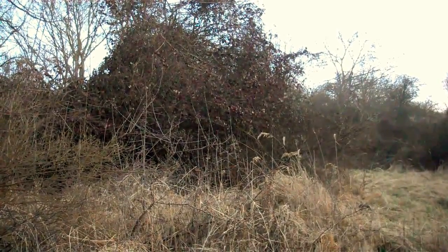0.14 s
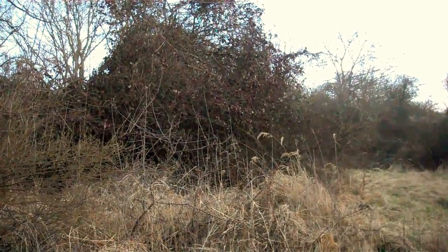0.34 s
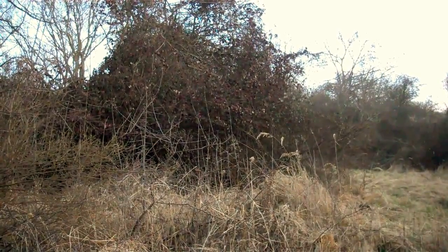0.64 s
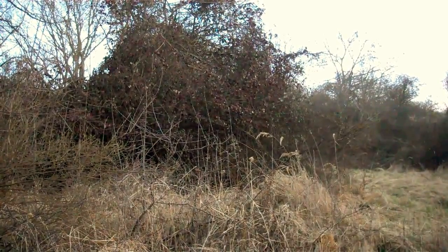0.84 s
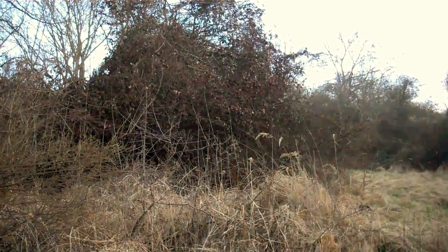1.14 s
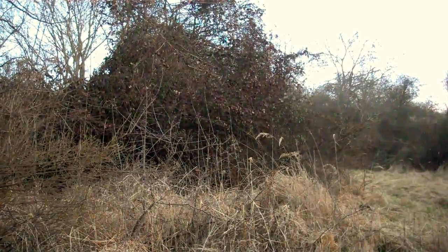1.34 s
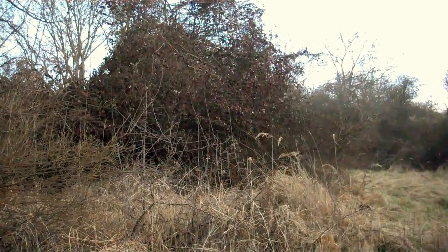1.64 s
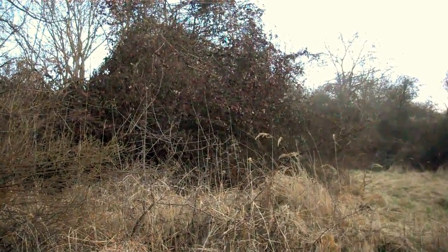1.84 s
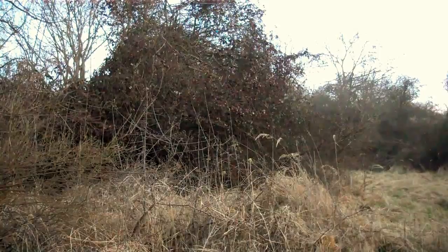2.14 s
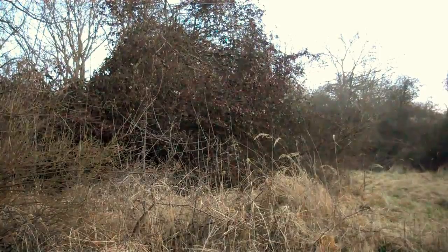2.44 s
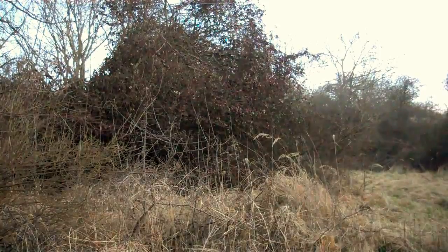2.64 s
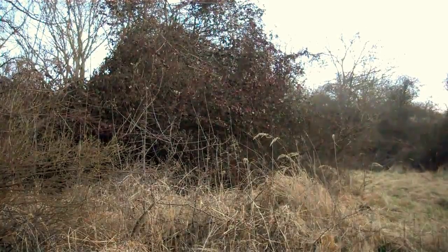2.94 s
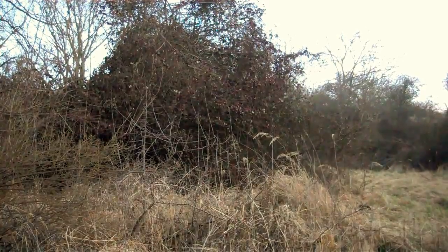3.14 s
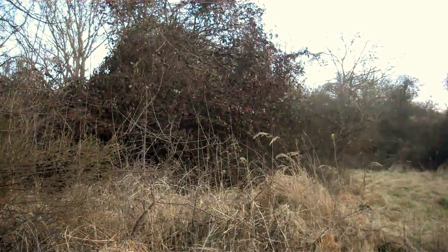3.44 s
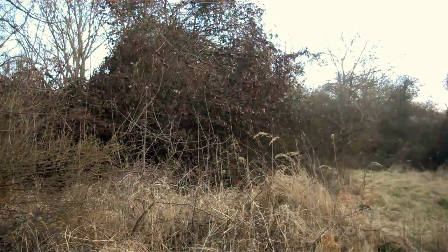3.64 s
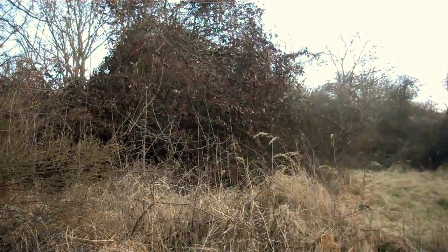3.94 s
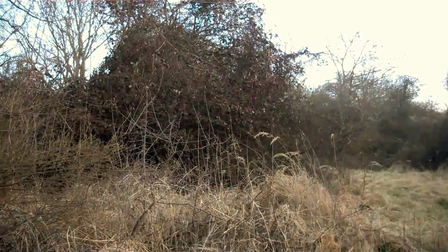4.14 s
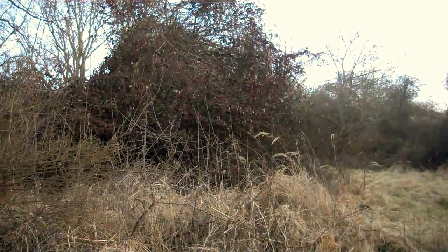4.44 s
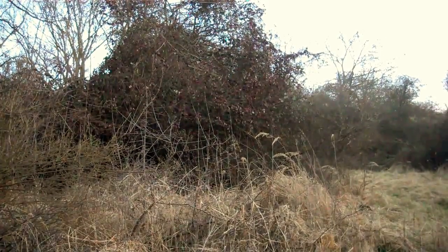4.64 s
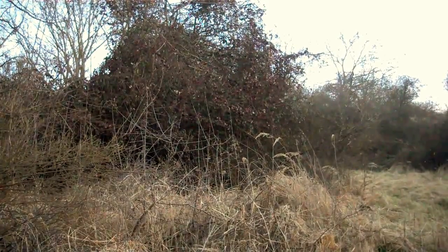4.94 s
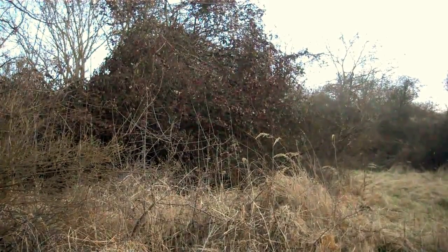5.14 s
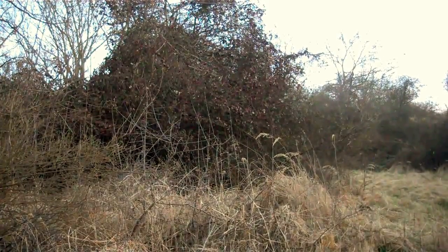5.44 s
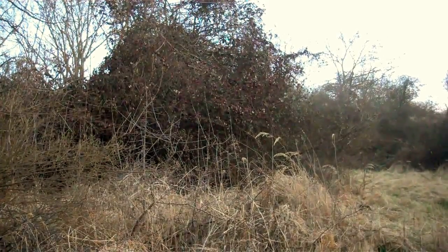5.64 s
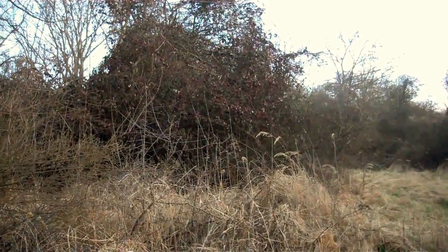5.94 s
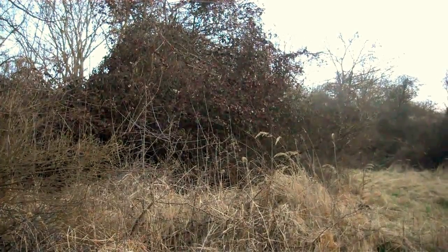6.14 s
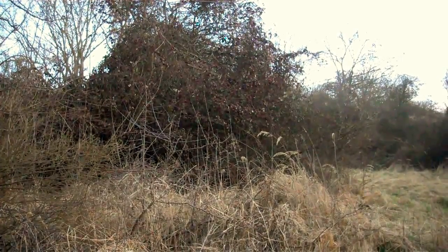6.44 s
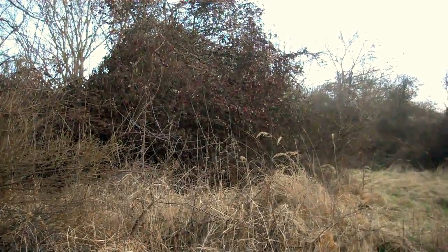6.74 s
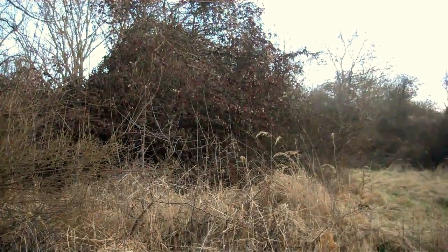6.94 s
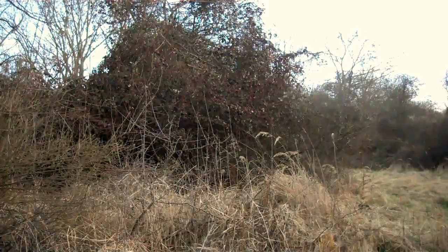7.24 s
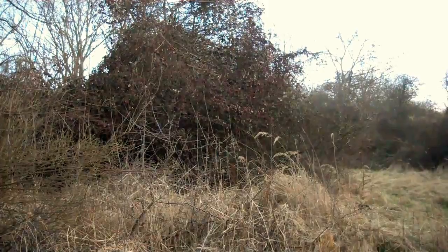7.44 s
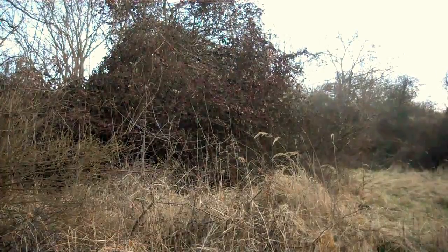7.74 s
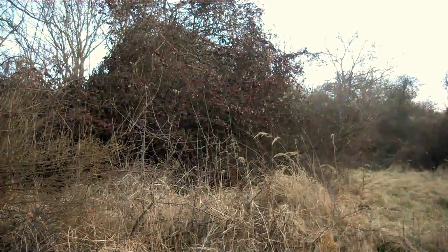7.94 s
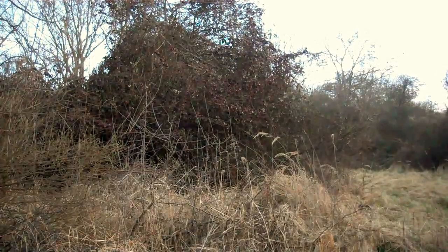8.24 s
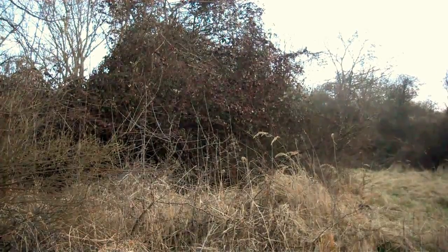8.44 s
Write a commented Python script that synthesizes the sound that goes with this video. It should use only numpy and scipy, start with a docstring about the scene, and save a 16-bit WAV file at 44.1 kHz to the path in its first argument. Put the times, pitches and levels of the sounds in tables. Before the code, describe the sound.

A songbird, fairly close and a little right of the microphone, opens with buzzy rattles and fast sweeping notes. After a gap, five thin, swelling whistles lead into a bright burst of warbling, high swoops and a brief trill. Strong wind makes an even, low rushing noise throughout this outdoor scene, with far birds calling faintly and a few small dry ticks.

```python
"""In a thicket by a windy field, a little to the right, a songbird sings: rattles, sweeps, a pause, five
swelling whistles, a warble, swoops and a trill. A vibrating membrane gives its nearly pure tones; fast
pulses, filtered by the throat, give its buzzes. The ground reflects the song and twigs and trunks scatter
it. A few dry ticks sound, far birds pipe faintly, and the wind roars steadily as low, broadband noise."""
import sys
import numpy as np
from scipy import signal
from scipy.fft import rfft, irfft, next_fast_len
from scipy.io import wavfile
from scipy.ndimage import uniform_filter1d, map_coordinates

SR = 44100
rng = np.random.default_rng(int(sys.argv[2]) if len(sys.argv) > 2 else 0)


def digitize_waveform(pressure):
    """Quantize a signal to 16-bit integers and store it at the path in sys.argv[1].

    Rows of a 2-D input are taken as channels; values are limited to [-1, 1].
    """
    field = np.atleast_2d(pressure).T
    bounded = np.clip(field, -1, 1)
    quanta = np.round(bounded * 32767).astype(np.int16)
    wavfile.write(sys.argv[1], SR, quanta)


N = 379260
TOP_HZ = 15700  # upper band limit

# Arched notes: onset t/s, duration/s, first f/Hz, last f/Hz, pitch vertex t/s, peak level/dB, peak t/s,
# start below peak/dB, end below peak/dB. Vertex and peak times count from the note's onset.
SINGLE_ARCHES = [(7.17, 0.022, 1610, 1310, .002, -31, .008, 6, 9),
                 (7.514, 0.032, 5330, 6700, -0.00038, -19, 0.014, 20, 4),
                 (7.537, 0.011, 6600, 9200, -.01, -24, .002, 3, 6.2),
                 (7.659, 0.032, 4960, 7300, -0.012, -15.5, 0.019, 8.5, 5.8),
                 (7.79, .04, 4870, 7900, -0.012, -16, .024, 11, 5.1),
                 (8.152, 0.025, 2720, 3560, .018, -18, 0.0093, 21, 3.3),
                 (8.163, .031, 2350, 3480, 0.031, -10.5, .021, 23, 3),
                 (8.191, 0.03, 3450, 4030, -.03, -8.5, .015, 4, 8.5),
                 (8.222, .029, 3380, 4160, 0.03, -9.5, 0.015, 8.4, 6),
                 (8.252, 0.034, 3530, 4236, 0.028, -10.5, 0.012, 9.6, 11.6)]
# Two-note figures: same columns, onsets counted from the start of the figure
SEESAW_NOTES = [(0, 0.02, 1300, 2200, .06, -28, 0.017, 16, 3),
                (.026, 0.013, 3550, 1820, 0.0145, -18.5, 0.005, 5, 9)]
HOOK_NOTES = [(0, .022, 3700, 4795, 0.021, -15.5, 0.016, 13, 4.3),
              (.016, .03, 3294, 2010, 0.0074, -10, 0.018, 10.3, 12)]
SCOOP_NOTES = [(0, .013, 1424, 1970, -0.014, -26, 0.02, 7.1, 0.5),
               (.011, .035, 1885, 2790, .027, -13.5, 0.019, 7.4, 9.5)]
TOCK_NOTES = [(0, .014, 2570, 1487, .012, -25.5, 0.0016, 2, 6),
              (.021, .034, 1335, 1484, .022, -31, 0.033, 4.1, 5)]
# Repeats of each figure: t/s, gain/dB
SEESAW_REPEATS = [(.468, 0.5), (.5164, 3), (0.5682, -.4)]
HOOK_REPEATS = [(.682, -1.4), (.846, .6), (1.022, -.5)]
SCOOP_REPEATS = [(0.759, -0.098), (.929, 0.19), (1.099, -0.39)]
TOCK_REPEATS = [(7.931, -.6), (8.037, 0.026)]
# Long whistles: t/s, duration/s, first f/Hz, last f/Hz, slide from above/Hz, waver depth/Hz,
# waver crest t/s, waver period/s, full level/dB, swell/dB
WHISTLE_NOTES = [(3.878, 0.344, 2770, 2690, 200, 25, 4.03, 0.165, -27.5, 28),
                 (4.595, 0.492, 2700, 2795, 200, 32, 4.825, .24, -24.5, 18),
                 (5.45, 0.41, 2690, 2590, 40, 30, 5.57, 0.21, -17, 15),
                 (6.094, 0.411, 2520, 2620, 200, 32, 6.29, .185, -17.5, 10.5),
                 (6.692, 0.356, 2515, 2525, 270, 14, 6.89, 0.1474, -18.5, 3.5)]
# Falling swoops: t/s, duration/s, top f/Hz, time constant/s, level/dB
SWOOP_NOTES = [(7.55, 0.049, 5800, 0.011, -6.5), (7.694, 0.045, 5120, 0.0083, -9.5),
               (7.835, 0.04, 5070, .008, -13)]
# Upward flicks of the warble: t/s, rise/Hz
WARBLE_FLICKS = [(7.352, 3200), (7.376, 480), (7.393, 852), (7.413, 199), (7.439, 476)]
# Buzz contours: t/s (the rattle's from its own start), pulse rate/Hz, level/dB
RATTLE_CONTOUR = [(0, 954, -12), (.004, 1045, -7), (.0095, 980, -1.5), (.022, 850, -15)]
SNAP_CONTOUR = [(1.209, 1800, -25), (1.216, 1120, -25.5), (1.226, 1805, -21.5), (1.237, 1920, -21.5),
                (1.254, 1920, -25.5), (1.259, 1910, -25)]
# Spectral shapes in the song: f/Hz, gain/dB
SWOOP_GAIN = [(2340, -4.5), (2850, -9), (4200, -1), (5800, -12)]  # along a swoop's descent
OVERTONE_GAIN = [(3200, -27), (5200, -53), (8500, -45.5), (10500, -38.5), (13000, -33.5), (14500, -48),
                 (15500, -60)]  # relative to the fundamental
SECOND_HARMONIC_GAIN = [(5600, 14), (6600, -5), (10500, 14), (14500, 21)]  # added for the second harmonic
HIGH_NOTE_HISS = [(2000, -17), (5000, -4.5), (8800, -16.5), (12500, 1.5), (15500, -28)]  # hiss that rises with the high notes
THROAT_RESPONSE = [(2300, -13), (3500, 0), (5900, -0.5), (7400, -1.5), (8200, -21), (11200, -17),
                   (15000, -24.5)]  # colours the buzzes
# Dry ticks: t/s, level/dB, f/Hz
DRY_TICKS = [(3.535, -40, 3000), (3.545, -40, 2900), (5.2945, -30, 2000), (5.886, -43, 6330)]
# Contours of a rising and a falling far call: t/s, f/Hz, level/dB
FAR_RISING = [(2.515, 3610, -51), (2.53, 3900, -48.5), (2.56, 3930, -48), (2.635, 4680, -52)]
FAR_FALLING = [(5.695, 5300, -57), (5.79, 3500, -62)]
# Repeats of the rising call: delay/s
FAR_RISING_DELAYS = [0, 3.805]
# Far pipes of constant pitch: t/s, level/dB, f/Hz
FAR_PIPES = [(.42, -55, 4300), (3.36, -61, 4300), (3.71, -59, 4280), (4.03, -65, 6950), (4.05, -60, 4265),
             (4.15, -58, 4480), (4.23, -59, 4150), (4.43, -56, 4280), (4.82, -54, 4265), (5.2, -51.5, 4265),
             (5.6, -51, 4265), (8.52, -55, 4265)]
# Far twitter, smeared by distance: t/s, first f/Hz, level/dB
FAR_TWITTER = [(4.04, 8200, -60), (4.27, 8100, -58), (4.46, 8100, -53), (4.65, 5900, -54)]
# Wind spectrum: f/Hz, relative spectral density/dB
WIND_SPECTRUM = [(12, -40), (30, -7.5), (55, -1), (140, -2.5), (650, -19), (1530, -34.5), (7640, -45.5),
                 (9800, -60.5), (13500, -66.5), (15500, -89.5)]
# Likeness of the wind on the two sides: f/Hz, correlation/1
WIND_COHERENCE = [(30, 1), (150, 0.6), (700, 0.79), (15000, 0)]
# Stereo balance: f/Hz, left minus right level/dB
BIRD_BALANCE = [(3000, -4), (6000, -5.5), (12000, 0.5)]
WIND_BALANCE = [(60, 4.3), (950, -1), (15000, 0.5)]


def membrane_tones():
    """A vibrating membrane gives a wavering sine; overtones grow with effort, rasp and hiss with pitch."""
    tone, hiss_envelope = np.zeros(N), np.zeros(N)
    for note, shift, gain_db in tonal_notes():
        hz, db, fade = contour(note)
        size = len(hz)
        db = db + gain_db + .75 * wobble(75, size)
        phase = phase_of(hz * (1 + .003 * wobble(90, size)))
        strain = np.clip(hz / 3000 - 1, 0, 1)
        wave = (1 + (.03 + .29 * strain) * wobble(711, size)) * np.sin(phase)
        for k in range(2, 7):
            flutter = 1 + .65 * wobble(hz.mean() / 8, size)
            effort_db = .12 * k ** 2 * np.minimum(db + 17.5, 0)
            colour_db = along(SECOND_HARMONIC_GAIN, k * hz) * (k == 2) - 16 * (k == 4)
            gain = amp(along(OVERTONE_GAIN, k * hz) + effort_db + colour_db) * (k * hz < TOP_HZ)
            wave += gain * flutter * np.sin(k * phase)
        onset, envelope = note[0][0] + shift, amp(db) * fade
        add(tone, onset, envelope * wave)
        add(hiss_envelope, onset, envelope * strain ** 1.5)
    hiss = unit_rms(filtered(rng.standard_normal(N), lambda hz: amp(along(HIGH_NOTE_HISS, hz))))
    return tone + amp(-19.5) * hiss_envelope * hiss


def tonal_notes():
    """Song is built of repeated figures and single notes: (contour points, shift/s, gain/dB) for each."""
    # the three hooks differ a little in length; the gain column also sets the length
    notes = [(arch(*row) * [1 + .08 * db, 1, 1], s, db) for row in HOOK_NOTES for s, db in HOOK_REPEATS]
    for figure, repeats in [(SEESAW_NOTES, SEESAW_REPEATS), (SCOOP_NOTES, SCOOP_REPEATS),
                            (TOCK_NOTES, TOCK_REPEATS)]:
        notes += [(arch(*row), s, db) for row in figure for s, db in repeats]
    for shape, rows in [(arch, SINGLE_ARCHES), (whistle, WHISTLE_NOTES), (swoop, SWOOP_NOTES)]:
        notes += [(shape(*row), 0, 0) for row in rows]
    return notes + [(cluck(), 0, 0), (warble(), 0, 0)]


def arch(onset, length, first_hz, last_hz, vertex_s, peak_db, peak_s, enter_db, leave_db):
    """A parabolic frequency sweep whose level rises to a peak and falls away."""
    t = np.linspace(0, length, 40)
    below_db = np.interp(t, [0, np.clip(peak_s, 0, length), length + 1e-6], [enter_db, 0, leave_db])
    return np.transpose([onset + t, parabola(t, first_hz, last_hz, vertex_s), peak_db - below_db])


def whistle(onset, length, first_hz, last_hz, slide_hz, waver_hz, crest_s, period_s, full_db, swell_db):
    """Slow frequency and amplitude modulation of a tone that slides in from above, swells and sags off."""
    t = np.linspace(.001, length, 200)
    waver = np.cos(2 * np.pi * (onset + t - crest_s) / period_s)
    glide_hz = first_hz + (last_hz - first_hz) * t / length + slide_hz * np.exp(-t / .031)
    sag_hz = 400 * np.exp((t - length) / .005)
    attack_db = 20 * np.log10(1 - np.exp(-t / .05))
    release_db = 26 * np.exp((t - length) / .009)
    db = full_db - swell_db * (1 - t / length) + attack_db - release_db + 1.3 * waver
    return np.transpose([onset + t, glide_hz - sag_hz + waver_hz * waver, db])


def swoop(onset, length, top_hz, fall_s, db, landing_hz=2310, release_db=11):
    """Frequency falls exponentially towards a low landing pitch."""
    t = np.linspace(0, length, 60)
    hz = landing_hz + (top_hz - landing_hz) * np.exp(-t / fall_s)
    return np.transpose([onset + t, hz, db + along(SWOOP_GAIN, hz) - release_db * (t / length) ** 8])


def cluck(onset=7.224, length=.0522, throb_s=.0128, depth_db=14):
    """Amplitude modulation makes a low arch throb three times before a weak tail."""
    t = np.linspace(0, length, 80)
    throb_db = -16.5 - depth_db * np.cos(np.pi * t / throb_s) ** 2
    db = np.where(t < 3 * throb_s, throb_db, -26)
    return np.transpose([onset + t, parabola(t, first_hz=1870, last_hz=1410, vertex_s=.021), db])


def warble(onset=7.341, length=.1047, held_hz=3232, flick_s=.0047, loss_db_per_khz=2.5):
    """Frequency modulation by Gaussian pulses: a held tone flicks upward, weaker the higher it reaches."""
    t = np.linspace(0, length, 150)
    rise_hz = sum(hz * np.exp(-.5 * ((onset + t - s) / flick_s) ** 2) for s, hz in WARBLE_FLICKS)
    attack_db = -11 * np.exp(-t / .0053)
    db = -11.5 - loss_db_per_khz * rise_hz / 1000 + attack_db
    return np.transpose([onset + t, held_hz + rise_hz, db])


def buzz(points, roughness):
    """Source and filter: fast pulses form a series of unsteady harmonics, weighted by the throat."""
    hz, db, fade = contour(points)
    k = np.arange(3, 19)[:, None]
    flutter = 1 + roughness * k * np.array([wobble(510, len(hz)) for _ in k])
    gain = amp(along(THROAT_RESPONSE, k * hz)) * (k * hz < TOP_HZ)
    harmonics = gain * flutter * np.sin(k * phase_of(hz) + 2 * np.pi * rng.random(k.shape))
    return amp(db) * fade * harmonics.sum(axis=0)


def rattles_and_snap(first_s=-.042, period_s=.10116, first_db=-37.5, step_db=1.05):
    """Bursts of pulses: five pairs of rattles grow louder, and a snap ends the first phrase."""
    out = np.zeros(N)
    for pair in range(5):
        s, db = first_s + pair * period_s, first_db + pair * step_db
        add(out, s, amp(db) * buzz(RATTLE_CONTOUR, roughness=.4))
        add(out, s + .03, amp(db + 2.5) * buzz(RATTLE_CONTOUR, roughness=.4))
    add(out, SNAP_CONTOUR[0][0], buzz(SNAP_CONTOUR, roughness=.16))
    return out


def thicket(song, ground_delay_s=.004):
    """Multipath: the ground echo beats against glides, twigs return treble, far trees a dull tail."""
    ground = np.pad(song, (round(ground_delay_s * SR), 0))[:N]
    twigs = filtered(scatter(song, t60=.13, rise_s=.009), lambda hz: (hz / 4000) ** .8)
    trees = filtered(scatter(song, t60=.7, rise_s=.03), lambda hz: 1 / (1 + (hz / 5500) ** 4))
    return song + amp(-14) * ground + amp(-12) * twigs + amp(-24) * trees


def scatter(x, t60, rise_s):
    """Diffuse scattering: many echoes merge into an exponentially decaying noise tail on each side."""
    t = np.arange(int(t60 * SR)) / SR
    tail = rng.standard_normal((2, len(t))) * amp(-60 * t / t60) * np.clip(t / rise_s, 0, 1)
    return signal.fftconvolve(x[None], tail / np.linalg.norm(tail[0]), axes=1)[:, :N]


def ticks(t60=.027, attack_s=.0016):
    """Damped oscillations, spread into a wide band by random amplitude modulation."""
    out, t = np.zeros(N), np.arange(SR // 20) / SR
    for s, db, hz in DRY_TICKS:
        ring = np.sin(2 * np.pi * hz * t) * (1 + .7 * wobble(hz, len(t)))
        add(out, s, amp(db - 60 * t / t60) * (1 - np.exp(-t / attack_s)) * ring)
    return out


def far_birds(pipe_s=.1, chip_s=.022, twitter_s=.25):
    """Distance leaves faint tones; random amplitude modulation blurs the calls, flock and twitter."""
    out = np.zeros(N)
    for call, shift in [(FAR_RISING, s) for s in FAR_RISING_DELAYS] + [(FAR_FALLING, 0)]:
        hz, db, fade = contour(call)
        blur = amp(2.5 * wobble(120, len(hz))) * (1 + .3 * wobble(400, len(hz)))
        add(out, call[0][0] + shift, amp(db) * blur * fade * np.sin(phase_of(hz)))
    t = np.arange(int(pipe_s * SR)) / SR
    swell = np.sin(np.pi * t / pipe_s)
    for s, db, hz in FAR_PIPES:
        add(out, s, amp(db) * swell * np.sin(2 * np.pi * hz * t))
    chip = np.sin(np.pi * np.clip(t / chip_s, 0, 1)) * np.sin(phase_of(4900 - 55000 * t))
    for s in 4.787 + .085 * np.arange(5):  # a run of quick falling chips
        add(out, s, amp(-55) * chip)
    for when, pitch, slope in rng.random((40, 3)):  # scattered notes of a flock
        hz = 5400 + 700 * pitch + 4000 * (slope - .5) * t
        blur = 1 + wobble(150, len(t))
        add(out, 3.5 + 2.2 * when, amp(-68) * swell * blur * np.sin(phase_of(hz)))
    progress = np.arange(int(twitter_s * SR)) / SR / twitter_s
    for s, hz, db in FAR_TWITTER:
        glide = np.sin(phase_of(hz * (1 - .09 * progress)))
        envelope = amp(db - 9 * progress) * np.sqrt(np.sin(np.pi * progress))
        add(out, s, envelope * wobble(700, len(progress)) * glide)
    return out


def wind(rms_db=-31.5):
    """Partial coherence: a steady roar is the sum and difference of two independent noises."""
    def mid_side_gains(hz):
        angle = np.arccos(np.clip(along(WIND_COHERENCE, hz), -1, 1)) / 2
        return amp(along(WIND_SPECTRUM, hz)) * [np.cos(angle), np.sin(angle)]
    mid, side = filtered(rng.standard_normal((2, N)), mid_side_gains)
    roar = panned(np.array([mid + side, mid - side]), WIND_BALANCE)
    return amp(rms_db) * unit_rms(roar)


def contour(points):
    """Smoothed pitch, level and end fades at each sample, from points of t/s, f/Hz, level/dB."""
    s, hz, db = np.transpose(points)
    length = s[-1] - s[0]
    t = s[0] + np.arange(int(length * SR)) / SR
    hz, db = (uniform_filter1d(np.interp(t, s, v), size=80, mode="nearest") for v in (hz, db))
    fade_s = .0015 + .02 * length
    return hz, db, np.clip(np.minimum(t - s[0], s[-1] - t) / fade_s, 0, 1)


def parabola(t, first_hz, last_hz, vertex_s):
    """Frequency varies with the square of the time from the vertex."""
    bend = (t - vertex_s) ** 2 - vertex_s ** 2
    return first_hz + (last_hz - first_hz) * bend / bend[-1]


def phase_of(hz):
    """Phase is the time integral of angular frequency."""
    return 2 * np.pi * np.cumsum(hz) / SR


def amp(db):
    """Amplitude ratio of a level in dB."""
    return 10 ** (np.asarray(db) / 20)


def unit_rms(x):
    """Normalisation to unit power."""
    return x / np.sqrt(np.mean(x ** 2) + 1e-20)


def along(points, hz):
    """Interpolation of (f/Hz, value) points on a logarithmic frequency axis."""
    f, values = np.transpose(points)
    return np.interp(np.log(hz + 1), np.log(f + 1), values)


def wobble(rate, size):
    """Low-pass noise: a spline through `rate` random knots a second."""
    knots = rng.standard_normal(int(size * rate / SR) + 4)
    return map_coordinates(knots, [np.arange(size) * rate / SR])


def filtered(x, response):
    """Linear filtering multiplies the spectrum by a frequency response."""
    size = next_fast_len(N + 8192)
    return irfft(rfft(x, size) * response(np.fft.rfftfreq(size, 1 / SR)), size)[..., :N]


def panned(x, balance):
    """A level difference between left and right gives direction."""
    return filtered(x, lambda hz: amp(np.outer([.5, -.5], along(balance, hz))))


def add(out, s, sound):
    """Superposes sound on out from time s."""
    start = round(s * SR)
    sound = sound[max(-start, 0):N - start]
    out[max(start, 0):][:len(sound)] += sound


def scene():
    """Superposition of the singer in its thicket, far birds with their scatter, ticks and wind."""
    song, far = membrane_tones() + rattles_and_snap(), far_birds()
    singer = panned(thicket(song), BIRD_BALANCE)
    distant = far + amp(-4) * scatter(far, t60=.5, rise_s=.011)
    return singer + distant + ticks() + wind()


def record(dry, dc_offset=.0023):
    """The recorder is a low-pass system with a small constant offset."""
    return dc_offset + filtered(dry, lambda hz: np.clip((TOP_HZ - hz) / 600, 0, 1))


dry = scene()
out = record(dry)
digitize_waveform(out)
```